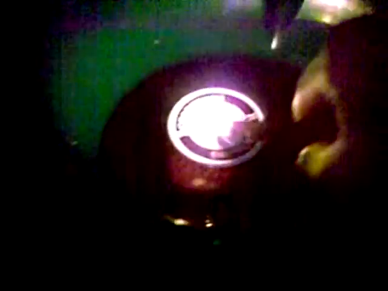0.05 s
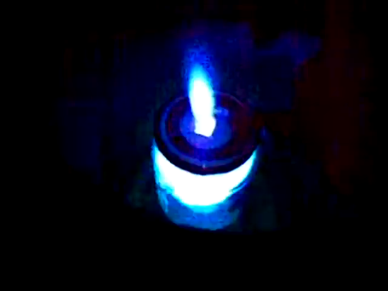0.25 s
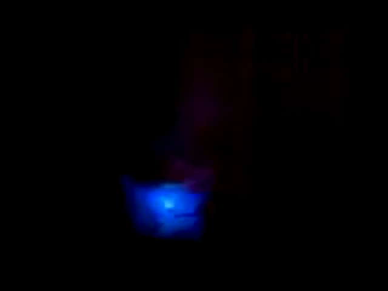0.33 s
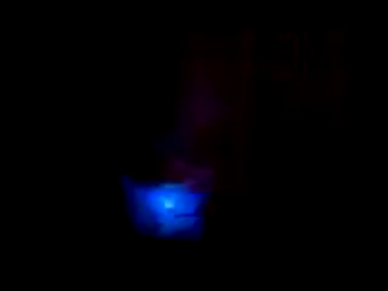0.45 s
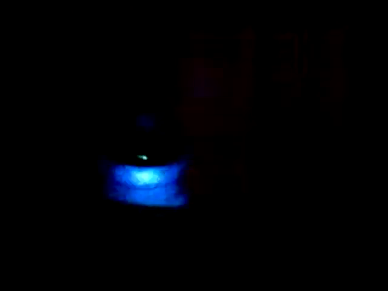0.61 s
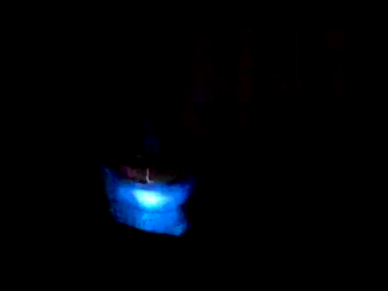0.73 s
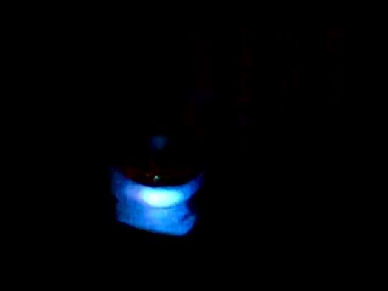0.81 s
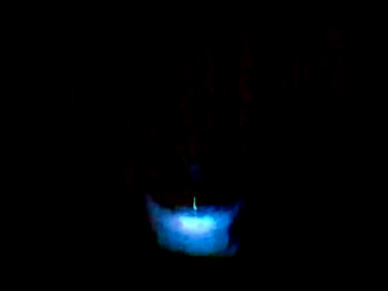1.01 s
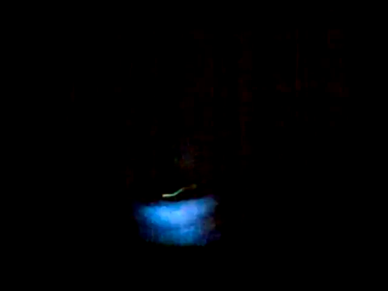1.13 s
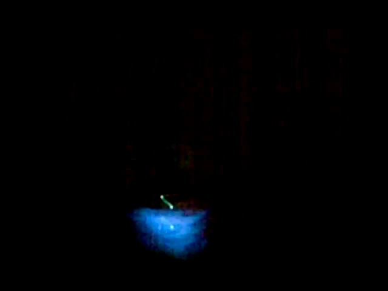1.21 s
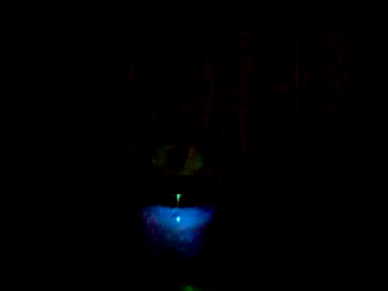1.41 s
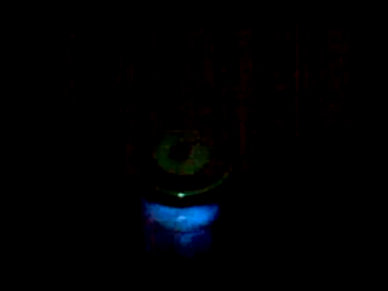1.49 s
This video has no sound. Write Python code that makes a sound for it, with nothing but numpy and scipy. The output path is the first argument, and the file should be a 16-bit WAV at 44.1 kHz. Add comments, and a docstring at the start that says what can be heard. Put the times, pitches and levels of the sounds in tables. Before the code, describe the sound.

A bright whoosh of igniting gas, followed by a flame pulsing softly inside a jar.

```python
"""A light knock rings a glass jar in a quiet room. Gas catches at the small opening in its lid and
rushes out burning, a turbulent jet heard as one short, bright whoosh. The flame left inside pulses:
each puff excites the resonances of the enclosed air with a thump and pushes a hiss through the
opening, faster as the burn swells, slower as it dies."""
import sys
import numpy as np
from scipy import signal
from scipy.fft import rfft, irfft
from scipy.io import wavfile
from scipy.ndimage import uniform_filter1d

SR = 44100
rng = np.random.default_rng(int(sys.argv[2]) if len(sys.argv) > 2 else 0)


def wrap_up_sound(samples):
    """Save the sound to the file named by the first command line argument, as 16-bit audio."""
    columns = np.atleast_2d(samples).T
    # keep every value between -1 and 1, then stretch to whole-number steps
    tamed = np.clip(columns, -1, 1)
    steps = np.round(tamed * 32767).astype(np.int16)
    wavfile.write(sys.argv[1], SR, steps)


N = 68355
TIME = np.arange(N) / SR
FIRST_PUFF_S = 0.4467

# Spectrum of the knock's contact and of the tick as the jet stops: frequency_hz, level_db
TICK_SPECTRUM = [(300, -32), (900, -24), (1400, 2), (2500, 2.5), (4500, -16), (12000, -20.5)]
# Spectrum of the jet and of the flame's spits: frequency_hz, level_db
JET_SPECTRUM = [(200, -23), (364, -10), (600, -12.5), (800, -4.5), (1050, -9.5), (1480, -1), (1750, -6),
                (2150, -0.5), (3200, -4.5), (4500, -3.5), (6500, -3), (8500, -5.5), (11000, -4),
                (12500, -10.5), (14500, -18)]
# Strength of the pulsing burn: time_s, thump_db, hiss_db
BURN_LEVELS = [(.445, -26.5, -59), (.49, -34, -55), (.56, -20, -43.5), (.62, -26.5, -40), (.69, -16.5, -37),
               (.78, -17, -30), (.88, -10, -28.5), (.96, -13.5, -29), (1.03, -13, -33), (1.1, -15, -32.5),
               (1.17, -17, -42), (1.27, -21, -40.5), (1.36, -22.5, -50), (1.45, -23.5, -48.5),
               (1.55, -31.5, -52)]


def from_db(db):
    """Amplitude ratio of a level in decibels."""
    return 10 ** (np.asarray(db) / 20)


def in_time(rows):
    """Linear interpolation of each column of a timed curve at every sample."""
    times, *columns = np.transpose(rows)
    return [np.interp(TIME, times, column) for column in columns]


def noise(spectrum, modes=()):
    """Spectrally shaped noise of unit power: a broad envelope with narrow peaks and dips."""
    hz = np.fft.rfftfreq(N, 1 / SR) + 1
    points_hz, points_db = np.transpose(spectrum)
    broad_db = np.interp(np.log(hz), np.log(points_hz), points_db)
    narrow_db = sum(db / (1 + (2 * (hz - centre) / width) ** 2) for centre, width, db in modes)
    shaped = irfft(rfft(rng.standard_normal(N)) * from_db(broad_db + narrow_db), N)
    return shaped / np.sqrt(np.mean(shaped ** 2) + 1e-20)


def split(x, hz):
    """Complementary filtering: the parts of a sound below and above a frequency."""
    low = signal.sosfiltfilt(signal.butter(2, hz, fs=SR, output="sos"), x)
    return low, x - low


def resonate(x, hz, width_hz):
    """A damped resonator: the wider its bandwidth, the sooner its ringing dies."""
    r = np.exp(-np.pi * width_hz / SR)
    return signal.lfilter([.5, 0, -.5], [1, -2 * r * np.cos(2 * np.pi * hz / SR), r * r], x + 1e-18)


def clicks(times, gains):
    """An impulse train."""
    return np.bincount((np.maximum(times, 0) * SR).astype(int), gains, N)[:N]


def since(start_s):
    """Seconds elapsed from a moment, zero before it."""
    return np.maximum(TIME - start_s, 0)


def dying(start_s, decay_s):
    """Exponential decay from a sudden start."""
    return (TIME >= start_s) * np.exp(-since(start_s) / decay_s)


def background():
    """The noise floor of the room: faint, steady and strongest in the bass."""
    floor_spectrum = [(18, -37), (30, 2), (212, -2), (674, -12), (766, -3), (827, -9), (3400, -14.5),
                      (5140, -17), (14000, -22.5)]  # ambient noise: frequency_hz, level_db
    return from_db(-59) * noise(floor_spectrum)


def knock():
    """Impact excitation: a light contact rings the damped modes of the jar's air and lid."""
    # Modes of the air and lid: pitch_hz, level_db, t60_s, delay_s
    knock_modes = [(276, -13.5, 0.28, 0.0049), (355, 4, 0.045, 0.0029), (1438, -5.5, 0.19, 0.0081),
                   (2084, -15.5, 0.052, 0), (3050, -18, 0.048, 0.014), (5300, -12, 0.014, 0)]
    start_s, knock_db, rise_s = 0.072, -28.5, 0.0018
    sound = from_db(-49.5) * dying(start_s, decay_s=0.033) * noise(TICK_SPECTRUM)
    for hz, db, t60_s, delay_s in knock_modes:
        age = since(start_s + delay_s)
        envelope = from_db(knock_db + db - 60 * age / t60_s) * (1 - np.exp(-age / rise_s))
        sound += envelope * np.sin(2 * np.pi * hz * age)
    return sound


def ignition():
    """Combustion noise: the gas catches with a dull rush that grows until the jet takes over."""
    catch_spectrum = [(300, -16), (600, -11), (900, -2), (1400, -0.5), (2200, 0.5), (3000, -11.5),
                      (6000, -25), (14000, -40)]  # gas catching: frequency_hz, level_db
    start_s, peak_s = 0.18, 0.252
    level_db = -42 + 193 * since(start_s) - 900 * since(peak_s)
    return from_db(level_db) * (TIME > start_s) * noise(catch_spectrum)


def outflow_db():
    """Exponential growth and decay of the jet: swell, flare, hold, collapse and weak afterflow."""
    swell_s, flare_s, hold_s, collapse_s, stop_s = 0.192, 0.2193, 0.24, 0.33, 0.423
    onset = 898 * np.minimum(TIME - swell_s, 0)  # slopes in dB per second
    swell = 255 * np.minimum(TIME - flare_s, 0)
    flare = np.interp(TIME, [flare_s, hold_s], [-17, 0])
    collapse = -454 * since(collapse_s)
    afterflow = -25.5 - 57 * since(collapse_s) - 550 * since(stop_s)
    return onset + swell + flare + np.maximum(collapse, afterflow)


def whoosh():
    """Turbulent jet noise: the burning gas sounds brighter the harder it blows, over a low rumble."""
    jet_modes = [(1325, 94, 1.5), (2110, 97, 4.5), (2370, 45, 7.5), (2530, 20, 12), (2860, 14, 11.5),
                 (3475, 17, 6), (3687, 34, 6.5), (4140, 160, -10), (5430, 56, 2.5), (6240, 22, 4),
                 (6460, 19, 6), (6630, 30, 13), (7980, 100, -12), (7770, 35, 13), (8500, 24, 8),
                 (8800, 110, -14), (9185, 25, 6)]  # resonances and dips of the jet: centre_hz, width_hz, gain_db
    rumble_spectrum = [(25, 2.5), (60, -2.5), (120, -0.5), (250, -3.5), (360, 10.5), (520, 2.5), (900, -52)]  # rumble under the jet: frequency_hz, level_db
    flow_db = outflow_db()
    body, treble = split(noise(JET_SPECTRUM, jet_modes), hz=4700)
    rush = body * from_db(flow_db) + treble * from_db(1.55 * flow_db)
    rumble = from_db(-35 + 0.3 * flow_db) * noise(rumble_spectrum)
    return from_db(-15) * rush + rumble


def spits():
    """Broadband transients: a tick as the jet stops, then short spits as the flame settles."""
    spit_bursts = [(.5115, -45, 0.0032), (.534, -39.5, 0.012)]  # spits of the flame: start_s, level_db, decay_s
    tick = from_db(-20) * dying(start_s=0.4085, decay_s=0.0018) * noise(TICK_SPECTRUM)
    envelope = sum(from_db(db) * dying(start_s, decay_s) for start_s, db, decay_s in spit_bursts)
    return tick + envelope * noise(JET_SPECTRUM)


def puff_times():
    """Pulsating combustion: one puff for each cycle of the flame's oscillation."""
    puff_rate = [(.445, 47.69), (.63, 40.44), (.8, 54.65), (.92, 58.32), (1.12, 50.61), (1.23, 42.73),
                 (1.28, 35.6), (1.38, 36.28), (1.47, 27.17), (1.52, 35.5), (1.54, 20)]  # pulsing of the flame: time_s, rate_hz
    rate_hz, = in_time(puff_rate)
    cycles = np.ceil(np.cumsum(rate_hz * (TIME >= FIRST_PUFF_S)) / SR)
    return TIME[1:][np.diff(cycles) > 0]


def thumps(times):
    """Cavity resonance: each puff draws air in, then pushes it out, and the air in the jar rings."""
    # Modes of the enclosed air: pitch_hz, width_hz, level_db, growth_db_per_db
    air_modes = [(73, 58, -4, -0.1), (161, 56, -5.5, 0.2), (231.2, 12.6, -19, 0), (320.3, 24, -22.5, 0.5),
                 (341.9, 23.6, -8.5, -0.36), (375, 35.4, 0, 0.1), (347, 124, -7.5, 0.8), (439, 24, -17, 3)]
    full_puff_db, puff_scatter_db, mode_scatter_db = -13, 1.1, 1.3
    inrush_lead_s, inrush_share, puff_width_s = 0.0015, 0.52, 0.00064
    thump_db, _ = in_time(BURN_LEVELS)
    chance = rng.standard_normal((len(times), len(air_modes) + 1))
    puff_db = np.interp(times, TIME, thump_db) + puff_scatter_db * chance[:, -1]
    air = 0
    for k, (hz, width_hz, db, growth) in enumerate(air_modes):
        mode_db = db + growth * (puff_db - full_puff_db)  # strong puffs thud, weak ones mostly ring
        gains = from_db(puff_db + mode_db + mode_scatter_db * chance[:, k])
        drive = clicks(times, gains) - inrush_share * clicks(times - inrush_lead_s, gains)
        air += resonate(drive, hz, width_hz)
    pulse = np.exp(-.5 * (np.arange(-200, 201) / SR / puff_width_s) ** 2)  # softens each puff
    return np.convolve(air, pulse / pulse.sum(), "same")


def roar():
    """Turbulent combustion: a soft, low roar that follows the strength of the thumps."""
    roar_spectrum = [(25, -10), (60, -18.5), (150, -9.5), (230, -10), (280, -7.5), (340, -2.5), (390, -2.5),
                     (480, -16), (600, -26.5), (1000, -50.5)]  # flame in the jar: frequency_hz, level_db
    thump_db, _ = in_time(BURN_LEVELS)
    return from_db(thump_db - 17) * (TIME > FIRST_PUFF_S) * noise(roar_spectrum)


def hisses(times):
    """Orifice noise: each puff expels hot gas with a brief sizzle, then a hiss and a faint whistle."""
    hiss_spectrum = [(300, 2.5), (650, -9.5), (900, -2.5), (1100, -7.5), (1400, -0.5), (1600, -8),
                     (2000, -3.5), (2800, -3.5), (3900, -11.5), (5200, -10), (7500, -15), (10500, -14),
                     (14000, -22)]  # escaping gas: frequency_hz, level_db
    opening_modes = [(956, 65, 7), (1301, 51, 6.5), (1484, 54, 10), (2190, 90, 4.5), (2384, 61, 5.5),
                     (2390, 90, -2), (2730, 86, 7)]  # resonances and dips of the opening: centre_hz, width_hz, gain_db
    whistle_spectrum = [(1500, -33), (2550, -22), (2720, -4), (2900, -19), (4500, -42)]  # whistle at the opening: frequency_hz, level_db
    _, hiss_db = in_time(BURN_LEVELS)
    strengths = from_db(2.5 * rng.standard_normal(len(times)))

    def flow(lag_s, decay_s, steady):
        """Amplitude modulation: a decaying surge after each puff, on top of a steady flow."""
        surges = signal.fftconvolve(clicks(times + lag_s, strengths), dying(0, decay_s))[:N]
        return uniform_filter1d(surges, size=170) + steady * (TIME > FIRST_PUFF_S)

    hiss, sizzle = split(from_db(hiss_db) * noise(hiss_spectrum, opening_modes), hz=2700)
    whistle = from_db(-36.5 + 0.4 * hiss_db) * noise(whistle_spectrum)
    long_flow = flow(lag_s=0.0023, decay_s=0.012, steady=0.14)
    brief_flow = flow(lag_s=0.0012, decay_s=0.0054, steady=0.45)
    return (hiss + whistle) * long_flow + sizzle * brief_flow


def room(x, t60_s=0.21, gap_s=0.004):
    """Reverberation: the diffuse reflections of a small room decay exponentially."""
    tail = rng.standard_normal(N) * (TIME > gap_s) * from_db(-60 * TIME / t60_s)
    return signal.fftconvolve(x, tail / np.sqrt(np.sum(tail ** 2)))[:N]


def scene():
    """Superposition of knock, whoosh and pulsing flame with the room's reflections, in mono."""
    times = puff_times()
    bright = knock() + ignition() + whoosh() + spits() + hisses(times)
    low = thumps(times) + roar()
    reflections = room(from_db(-10) * bright + from_db(-18) * low)
    return (bright + low + reflections + background())[None]


def record(dry):
    """Soft saturation rounds the highest peaks, and a steep low-pass filter cuts the top treble."""
    ceiling, cutoff_hz = 0.98, 14200
    low_pass = signal.ellip(10, .1, 80, cutoff_hz, fs=SR, output="sos")
    return signal.sosfilt(low_pass, ceiling * np.tanh(dry / ceiling))


dry = scene()
out = record(dry)
wrap_up_sound(out)
```